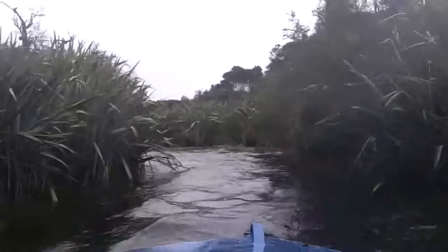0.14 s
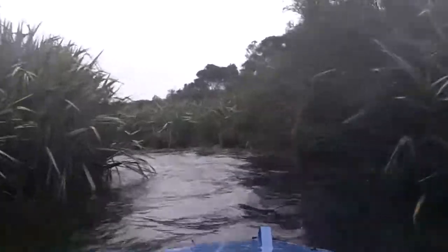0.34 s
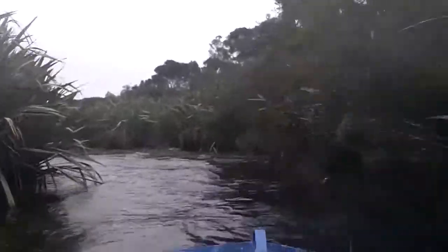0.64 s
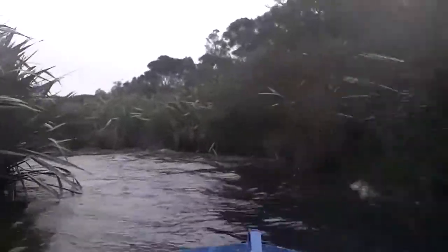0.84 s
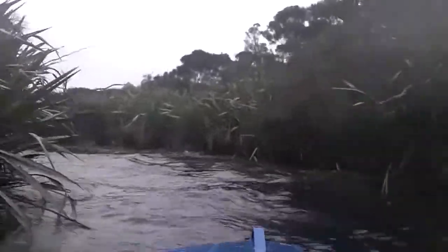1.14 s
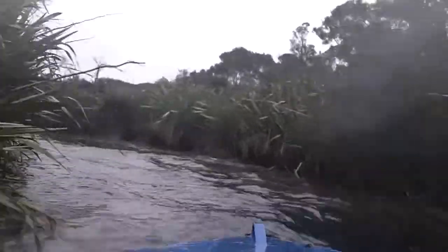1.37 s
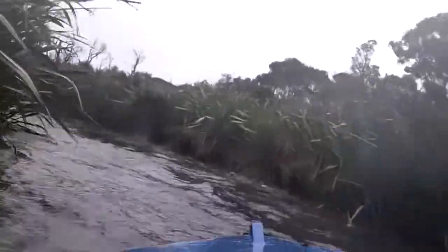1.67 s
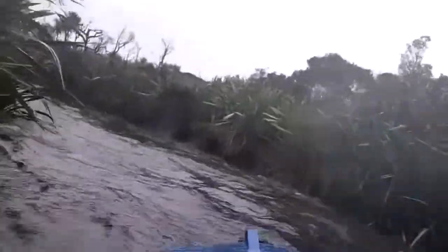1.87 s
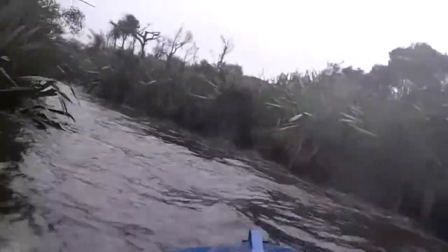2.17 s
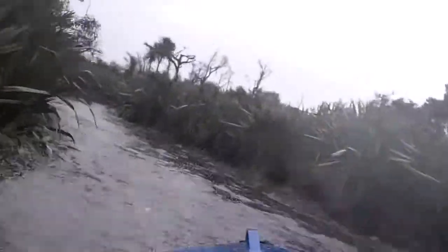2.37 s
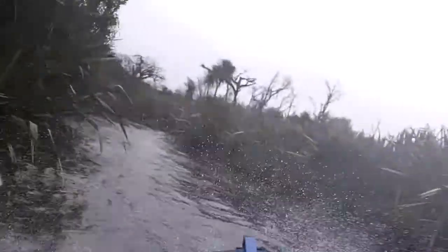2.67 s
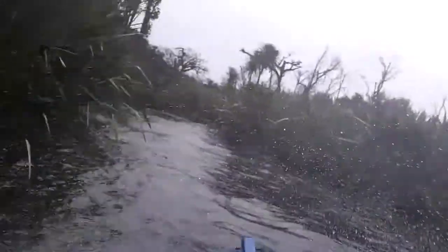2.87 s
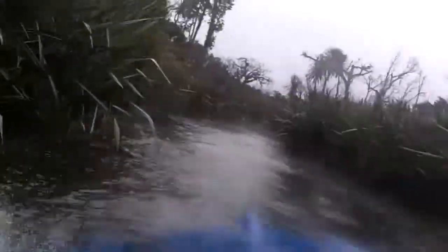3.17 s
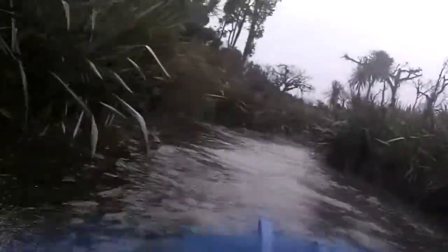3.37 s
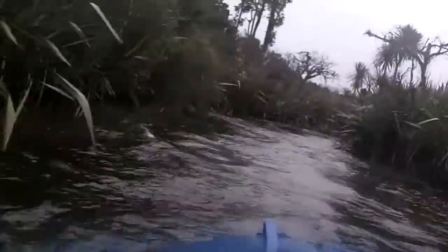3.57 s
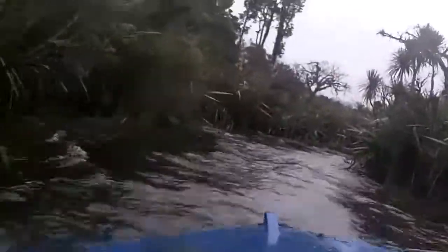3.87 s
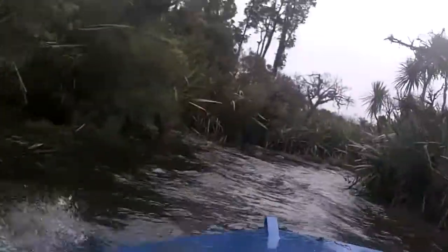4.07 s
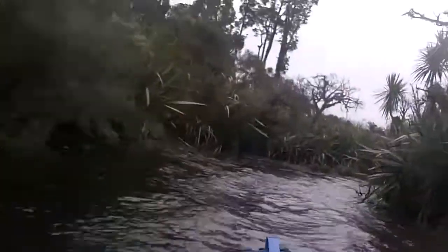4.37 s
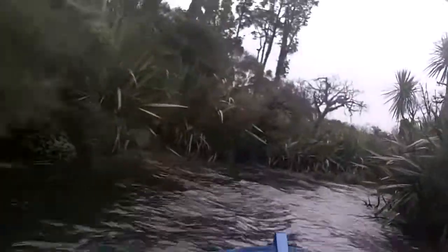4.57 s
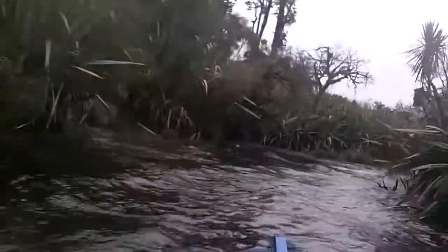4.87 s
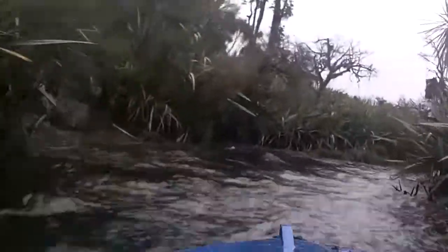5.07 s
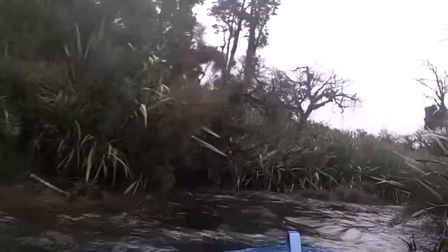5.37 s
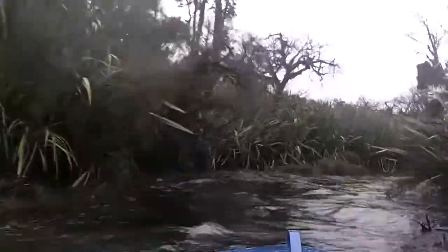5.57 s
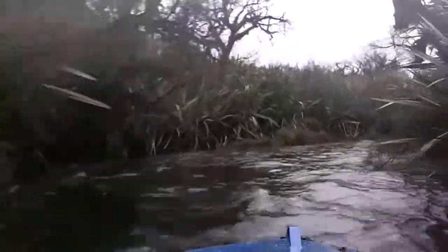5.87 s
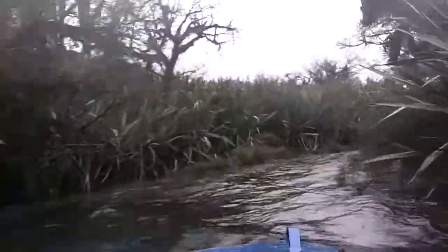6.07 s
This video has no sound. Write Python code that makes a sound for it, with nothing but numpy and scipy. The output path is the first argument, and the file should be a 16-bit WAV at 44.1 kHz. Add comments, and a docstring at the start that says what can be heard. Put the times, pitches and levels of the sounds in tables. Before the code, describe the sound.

A continuous, throaty boat engine dominates, its low harmonics fluttering through the hull against dense, dark water noise and rumbling wind. It eases off, takes a heavy knock with a tiny rattle, then opens up to a higher pitch for over a second before sinking again. Faint wash seethes along the sides, with occasional drops ticking on the camera. Close, boxy outdoor sound with little treble, crackling finely on the loud low peaks.

```python
"""An engine's orders drone through the hull of a jetboat on a river, over a muffled roar of water and wind.
The engine eases off, opens up and eases again; each order is a wavering sine at a multiple of the shaft rate.
Wind, roar, wash and churn are coloured noise; spray is brief grainy noise; low throbs are bell-shaped tones.
A fine crackling fizz follows the loudness of the low sound: noise gated by the waveform itself."""
import sys
import numpy as np
from scipy.fft import rfft, irfft, next_fast_len
from scipy.io import wavfile
from scipy.ndimage import uniform_filter1d, map_coordinates

SR = 44100
rng = np.random.default_rng(int(sys.argv[2]) if len(sys.argv) > 2 else 0)


def to_wav(sig):
    """Store sig (one row per channel, or 1-D mono) as 16-bit WAV at the path in sys.argv[1].

    Samples outside -1..1 are clipped; the rate is SR.
    """
    pcm = np.clip(np.atleast_2d(sig), -1, 1) * 32767
    pcm = np.round(pcm).astype(np.int16)
    wavfile.write(sys.argv[1], SR, pcm.T)  # frames by channels


N = 274302
T = np.arange(N) / SR


def amp(db):
    """Amplitude ratio of a level in dB."""
    return 10 ** (np.asarray(db) / 20)


def unit(x):
    """x scaled to rms 1."""
    return x / np.sqrt(np.mean(x ** 2) + 1e-20)


def curve(rows):
    """One value per sample from (time_s, value) rows."""
    return np.interp(T, *np.transpose(rows))


def wobble(knots_per_s):
    """A smooth random curve through Gaussian knots."""
    knots = rng.standard_normal(int(N * knots_per_s / SR) + 4)
    steps = np.arange(0, len(knots) - 1, .125)
    smooth = map_coordinates(knots, [steps])
    return np.interp(T * knots_per_s, steps, smooth)


def filtered(x, response):
    """x times a response of frequency."""
    m = next_fast_len(N + 8192)
    spectrum = rfft(x, m) * response(np.fft.rfftfreq(m, 1 / SR))
    return irfft(spectrum, m)[..., :N]


def coloured(x, points):
    """x shaped by (freq_hz, gain_db) points on a log frequency axis."""
    freq_hz, gain_db = np.transpose(points)
    return filtered(x, lambda hz: amp(np.interp(np.log(hz + 1), np.log(freq_hz), gain_db)))


def noise(points):
    """Coloured noise of rms 1 whose slow level is held even."""
    x = coloured(rng.standard_normal(N), points)
    slow_power = np.abs(uniform_filter1d(x * x, size=6000))
    return x / np.sqrt(slow_power + 1e-12)


def pair(side_db):
    """White noise for two ears, mostly alike; side_db is the difference over the common part."""
    mid, side = rng.standard_normal((2, N))
    return unit(mid + amp(side_db) * np.array([side, -side]))


def swell(s, width_s):
    """A Gaussian rise and fall around time s, peak 1."""
    return np.exp(-.5 * ((T - s) / width_s) ** 2)


# engine shaft rate: time_s, shaft_turns_per_s
SPEED = [(0, 57.5), (.21, 57.2), (.45, 54.9), (.75, 53.6), (1.26, 52.1), (1.7, 51.7), (2.3, 51.7),
         (2.79, 51.4), (2.96, 52.2), (3.07, 54.7), (3.17, 59.5), (3.36, 62.9), (3.7, 63.2), (4.02, 64.4),
         (4.17, 63), (4.35, 60.8), (4.6, 60.5), (4.72, 58.8), (4.84, 55), (5.09, 50.6), (5.4, 48.8),
         (5.85, 48.6), (6.22, 50)]
LOAD_FROM_TURNS_PER_S, LOAD_SPAN_TURNS_PER_S = 62, 18


def throttle():
    """Load from shaft rate: 0 below 62 turns per second, rising slightly at the fastest revving."""
    load = (curve(SPEED) - LOAD_FROM_TURNS_PER_S) / LOAD_SPAN_TURNS_PER_S
    return np.clip(load, 0, 1)


# levels of the four leading orders, before LEADING_GAIN_DB: time_s, rms_db
FIRING = [(0, -27), (.33, -24), (.6, -27.5), (0.849, -25), (1.75, -34), (1.951, -24.5), (2.2, -30.5),
          (2.549, -24.5), (3.051, -32), (3.55, -28.5), (3.899, -31), (4.349, -27), (4.951, -39.5),
          (5.169, -25), (5.58, -22), (6.03, -33), (6.191, -20)]
DRONE = [(0, -14), (.27, -33.5), (0.469, -23), (0.821, -22), (1.452, -24.5), (1.699, -30), (1.9, -24.5),
         (2.251, -29.5), (2.549, -26.5), (2.75, -21), (3.25, -28), (4.5, -36), (5.1, -42.5), (5.28, -22.5),
         (5.45, -39), (6.199, -33)]
FIRING_OCTAVE = [(0, -34.5), (.2, -28), (.48, -29.5), (.95, -26.5), (1.2, -28), (1.7, -28), (2.201, -30),
                 (2.389, -21.5), (2.849, -32.5), (3.35, -35), (3.65, -25), (4.401, -29), (5.35, -32.5),
                 (5.52, -29.5), (5.95, -27), (6.199, -27)]
WHINE = [(0, -34.5), (.35, -27), (0.599, -42.5), (0.999, -40.5), (1.25, -31), (1.5, -35), (2.029, -25),
         (2.22, -41), (2.45, -27), (2.619, -35), (2.8, -25), (3, -35), (3.159, -24.5), (3.35, -45),
         (4.05, -46.5), (4.301, -31), (4.5, -36.5), (4.769, -28.5), (5, -36.5), (6.199, -43)]
# leading orders: shaft_multiple, level_curve
LEADING = [(3, FIRING), (5, DRONE), (6, FIRING_OCTAVE), (9, WHINE)]
LEADING_GAIN_DB, LEADING_FLUTTER_DB = 1, 1.18
# lesser orders through the hull's resonances: shaft_multiple, then rms_db at each speed step
LESSER_ORDERS = [(1, -39.5, -41, -42, -28.5, -38, -42.5), (1.5, -33, -38.5, -34, -57, -41.5, -29),
                 (2, -40.5, -37, -34.5, -28.5, -32.5, -30.5), (2.5, -40, -40, -35.5, -40, -40, -39.5),
                 (4, -40, -35, -26, -29, -28.5, -29), (4.5, -45, -31.5, -29, -38, -25, -32),
                 (5.5, -33.5, -28, -40, -24.5, -32.5, -36.5), (7, -36.5, -32, -35.5, -40.5, -29, -29.5),
                 (8, -48, -46, -46, -38.5, -31.5, -34), (10, -41.5, -40, -54, -50, -56, -59.5)]
# speed steps: shaft_turns_per_s
SPEED_STEPS = [49, 52, 54, 57, 61, 64]
FLUTTER_DB, FLUTTERS_PER_S = 1.1, 8
# ringing panel, before GROWL_GAIN: pitch_hz, rms_db
GROWL_PANEL = [(540, -60), (660, -61.5), (750, -62), (830, -52), (880, -59), (950, -65.5), (1150, -65),
               (1400, -69)]
# growl gain: time_s, gain_db
GROWL_GAIN = [(0, 2.5), (.4, 0.5), (.9, -4), (1.5, -0.5), (2.2, -4.5), (2.8, 3.5), (3.6, -1), (4.4, 2),
              (5, -4), (6.2, -4)]
GROWL_FLUTTER_DB = 1
WAVER_RAD, LOAD_WAVER_RAD = 0.012, 0.02  # per shaft multiple; the second is also per unit load
RASP_DB, RASPS_PER_S, RASP_FROM_MULTIPLE = 1.8, 90, 9


def engine():
    """Shaft orders via the hull, halves too as a four-stroke cycle is two turns; high ones rasp and growl."""
    speed = curve(SPEED)
    turns = np.cumsum(speed * (1 + .0015 * wobble(14))) / SR
    waver_rad = WAVER_RAD + LOAD_WAVER_RAD * throttle()
    rasp = amp(RASP_DB * wobble(RASPS_PER_S))

    def order(multiple, rms_db, flutter_db):
        """One wavering, fluttering sine at a multiple of the shaft."""
        phase = 2 * np.pi * (multiple * turns + rng.random())
        phase = phase + waver_rad * multiple * wobble(35)
        level = np.sqrt(2) * amp(rms_db + flutter_db * wobble(FLUTTERS_PER_S))
        tone = level * np.sin(phase)
        return tone * rasp if multiple >= RASP_FROM_MULTIPLE else tone

    leading = sum(order(multiple, curve(level) + LEADING_GAIN_DB, LEADING_FLUTTER_DB)
                  for multiple, level in LEADING)
    lesser = sum(order(multiple, np.interp(speed, SPEED_STEPS, step_db), FLUTTER_DB)
                 for multiple, *step_db in LESSER_ORDERS)
    growl = sum(order(multiple, np.interp(multiple * speed, *np.transpose(GROWL_PANEL)), GROWL_FLUTTER_DB)
                for multiple in range(11, 19))
    return leading + lesser + amp(curve(GROWL_GAIN)) * growl


# water on the hull: time_s, rms_db
ROAR_LEVEL = [(0, -21.5), (.8, -23), (1.8, -21.5), (2.8, -22), (3.6, -21.5), (4.4, -22.5), (4.85, -19.5),
              (5.5, -20.5), (6.2, -19.5)]
# its spectrum: freq_hz, relative_db_per_hz
ROAR_TONE = [(90, -15.5), (130, -2), (190, -2.5), (260, 0.5), (310, 0), (390, -2), (480, -8), (540, -14.5),
             (620, -26.5), (800, -31), (1200, -83)]
ROAR_CHOP_DB = 1.07


def roar(chop):
    """Water roaring on the hull: low noise whose level moves with the ripples."""
    return amp(curve(ROAR_LEVEL) + ROAR_CHOP_DB * chop) * noise(ROAR_TONE)


# wind on the camera: time_s, rms_db
WIND_LEVEL = [(0.03, -23.5), (1.09, -27), (1.47, -21.5), (2.09, -26), (2.14, -23.5), (2.26, -26.5),
              (2.84, -24), (6.14, -25.5), (6.19, -34)]
# its spectrum: freq_hz, relative_db_per_hz
BUFFET_TONE = [(6, -0.5), (15, -2), (30, -1), (60, -3), (100, -2), (150, -12.5), (300, -36), (800, -92)]
GUST_DB, GUSTS_PER_S = 1.5, 9


def wind():
    """Wind buffeting the camera: very low noise swung by random gusts."""
    return amp(curve(WIND_LEVEL) + GUST_DB * wobble(GUSTS_PER_S)) * noise(BUFFET_TONE)


# wash along the sides: time_s, rms_db
WASH_LEVEL = [(0, -41.5), (.3, -40.5), (.7, -47.5), (1.1, -42.5), (1.45, -39), (1.75, -41.5), (2.1, -42),
              (2.75, -40.5), (3.4, -35), (3.95, -39), (4.35, -36), (4.75, -39.5), (4.95, -42), (5.5, -41),
              (6.2, -42)]
# its spectrum: freq_hz, relative_db_per_hz
WASH_TONE = [(350, -26), (550, 9), (650, 3), (750, -1.5), (835, -1), (930, -6), (1200, -13.5), (1600, -22),
             (2300, -25), (2800, -45), (5000, -53), (8000, -82)]
WASH_CHOP_DB, SEETHE_DB, SEETHES_PER_S = 1.0, 1.8, 40
# upper roar of the hull: freq_hz, relative_db_per_hz
DRUMMING_TONE = [(250, -28.5), (340, -8), (400, -2.5), (470, -2), (530, -13.5), (620, -29.5), (1000, -79)]
DRUMMING_DB = 9.5  # over WASH_LEVEL


def wash(chop):
    """Seething noise along the sides plus the hull's upper roar, both moving with the ripples."""
    seething = amp(SEETHE_DB * wobble(SEETHES_PER_S)) * noise(WASH_TONE)
    drumming = amp(DRUMMING_DB) * noise(DRUMMING_TONE)
    return amp(curve(WASH_LEVEL) + WASH_CHOP_DB * chop) * (seething + drumming)


# white water churned up by the jet: freq_hz, relative_db_per_hz
CHURN_TONE = [(500, -29), (1050, 1.5), (1500, -4), (2300, -11), (2800, -21), (6000, -50.5)]
CHURN_DB, CHURN_RISE_DB = -67, 13  # at zero load; rise per unit load


def churn():
    """White water behind the jet: noise that rises with load."""
    return amp(CHURN_DB + CHURN_RISE_DB * throttle()) * noise(CHURN_TONE)


def water_width():
    """Faint water noise of opposite sign in the two ears."""
    side = amp(-52.0) * noise([(40, -38.0), (150, -22.0), (300, 8.0), (480, 0.5), (700, -15.0),
                               (1500, -40.5), (4000, -60.0)])
    return np.array([side, -side])


# loudest spits of the fizz: time_s, relative_db
SPITS = [(.153, -1.5), (.182, -3), (0.463, -0.5), (0.577, -4), (.719, 5.5), (.843, -0.5), (1.046, -2.5),
         (1.502, 2.5), (1.596, 1), (2.291, -0.5), (2.315, 1.5), (2.508, 6), (2.998, -1), (3.047, 4.5),
         (3.708, -0.5), (3.821, 6.5), (4.478, 2.5), (4.553, 0), (4.819, 3), (4.976, 1), (5.221, 6),
         (5.3, 0.5), (5.395, -3), (5.726, -2), (5.77, -4.5), (5.854, -2), (5.937, 1), (5.967, -3)]
SPIT_WIDTH_S = .00045
# spectrum of the fizz: freq_hz, relative_db_per_hz
CRACKLE_TONE = [(300, 8.5), (1000, 5), (2300, 3.5), (2750, -11), (3100, -4.5), (3900, -6), (4900, -3.5),
                (5500, -23.5), (7000, -18.5), (8200, -38), (9800, -16.5), (11000, -30.5), (12200, -19.5),
                (15000, -30)]
# stereo width of the fizz: freq_hz, side_over_mid_db
CRACKLE_WIDTH = [(40, -40), (300, -23.5), (1000, -18.5), (2000, -13.5), (4000, -10), (8000, -4),
                 (12000, 1.5)]
BOOM_RMS = 0.17  # a sustained boom above this crackles no harder


def crackle(x, knee, trough_knee, steepness, rest, onset, level_db):
    """A fine fizz following the loudness of the low sound, stronger on its crests than in its troughs."""
    boom = np.maximum(np.abs(uniform_filter1d(x * x, size=1100)) / BOOM_RMS ** 2, 1) ** .5
    threshold = boom * np.where(x > 0, knee, trough_knee)
    over = (np.abs(x) / threshold) ** steepness
    drive = (np.abs(uniform_filter1d(x * x, size=400)) / onset ** 2) ** 2
    gate = rest * drive / (1 + drive) + over / (1 + over)
    spits = sum(amp(db) * swell(s, SPIT_WIDTH_S) for s, db in SPITS)
    grain = amp(2.3 * wobble(900))
    fizz = (grain * gate + spits) * rng.standard_normal((2, N))
    mid, side = coloured(fizz, CRACKLE_TONE)
    side = coloured(side, CRACKLE_WIDTH)
    return amp(level_db) * unit(np.array([mid + side, mid - side]))


# sheets of spray: centre_s, width_s, level_db
SHEETS = [(2.753, 0.039, -62), (2.851, 0.017, -59.5), (3.128, 0.039, -63.5), (3.186, 0.03, -66),
          (3.38, 0.018, -61.5)]
# their spectrum: freq_hz, relative_db_per_hz
SHEET_TONE = [(1500, -20), (4000, -1.5), (6000, -14), (8000, -15.5), (10000, -7), (11200, -12.5),
              (15000, -16)]
# single drops on the camera: centre_s, level_db
DROPS = [(1.309, -44.5), (2.684, -49), (2.761, -53), (2.844, -41.5), (3.473, -57), (5.117, -49.5)]
DROP_WIDTH_S = .0008
# thin jets of spray: centre_s, width_s, level_db
SIZZLES = [(.313, .017, -61), (2.15, .008, -64), (3.135, .025, -67)]
# their narrow band: freq_hz, relative_db_per_hz
SIZZLE_TONE = [(8500, -34), (9500, -8), (10100, -1), (10800, -7.5), (12000, -32)]


def spray():
    """Sheets of fine drops hiss on the camera, big drops tick and thin jets sizzle: grainy noise, enveloped."""
    sheets = sum(amp(db) * swell(s, width_s) for s, width_s, db in SHEETS)
    hiss = unit(coloured(pair(side_db=-5.0) * amp(8.4 * wobble(600)), SHEET_TONE))
    drops = sum(amp(db) * swell(s, DROP_WIDTH_S) for s, db in DROPS)
    tick_tone = [(1000, -16.5), (4200, 2.0), (6000, -15.5), (15000, -21.5)]
    tick = unit(coloured(pair(side_db=-6.5), tick_tone))
    jets = sum(amp(db) * swell(s, width_s) for s, width_s, db in SIZZLES)
    sizzle = unit(coloured(pair(side_db=-5) * amp(5 * wobble(300)), SIZZLE_TONE))
    return sheets * hiss + drops * tick + jets * sizzle


# low throbs: hull slaps, and two brief swells of the engine's low orders at 3.39 and 3.88 s
# centre_s, width_s, pitch_hz, envelope_peak_db
THROBS = [(2.137, .017, 24, -11.5), (2.16, .010, 262, -7), (3.39, .05, 125, -20), (3.88, .05, 94, -20.5),
          (4.49, .03, 22, -16), (5.76, .035, 30, -19)]
# loose fitting: centre_s, envelope_peak_db
RATTLES = [(2.1555, -45), (2.1628, -43)]
RATTLE_HZ, RATTLE_WIDTH_S = 3700, .0008


def throbs():
    """Hull slaps and two swells of low engine orders, as short tones; the hardest slap rattles a loose fitting."""
    booms = sum(amp(db) * swell(s, width_s) * np.sin(2 * np.pi * hz * (T - s))
                for s, width_s, hz, db in THROBS)
    rattle = sum(amp(db) * swell(s, RATTLE_WIDTH_S) * np.sin(2 * np.pi * RATTLE_HZ * (T - s))
                 for s, db in RATTLES)
    return booms + rattle


# brief dips in level after the hardest slap: time_s, gain_db
DIPS = [(2.162, 0), (2.172, -6.5), (2.208, -6), (2.222, 0), (2.238, 0.5), (2.244, -3.5), (2.28, -3),
        (2.289, 0), (2.474, 0), (2.482, -3), (2.498, -3), (2.505, 0)]
WASH_DUCK = 1.6  # wash and churn follow the dips this many times deeper in dB
RIPPLES_PER_S = 22


def scene():
    """Engine, wind and water dip together; throbs and spray do not. Only spray and water_width differ by ear."""
    chop = wobble(RIPPLES_PER_S)
    dips_db = curve(DIPS)
    steady = engine() + wind() + roar(chop) + water_width()
    hiss = wash(chop) + churn()
    return amp(dips_db) * steady + amp(WASH_DUCK * dips_db) * hiss + spray() + throbs()


TOP_HZ = 15800


def record(dry):
    """Adds the fizz that follows the low sound; nothing passes above the band limit."""
    wet = dry + crackle(dry, knee=0.24, trough_knee=.39, steepness=4.7, rest=.17, onset=0.13, level_db=-52.0)
    return filtered(wet, lambda hz: hz < TOP_HZ)


dry = scene()
out = record(dry)
to_wav(out)
```